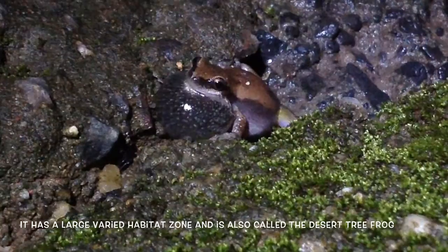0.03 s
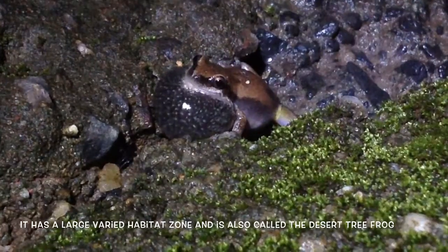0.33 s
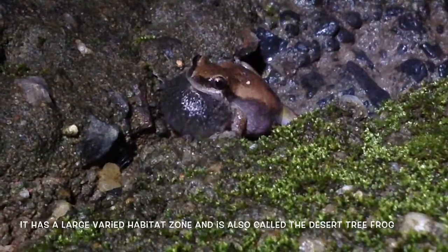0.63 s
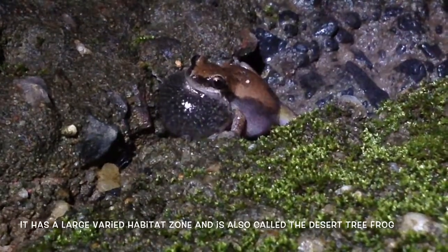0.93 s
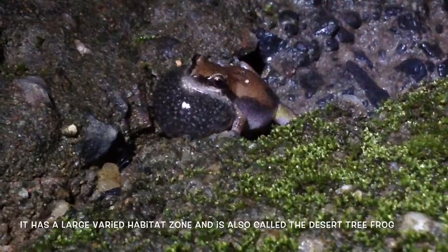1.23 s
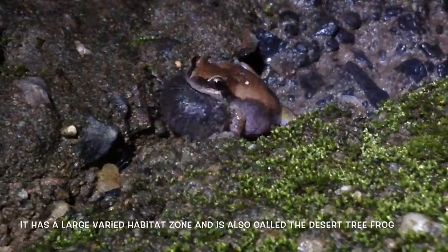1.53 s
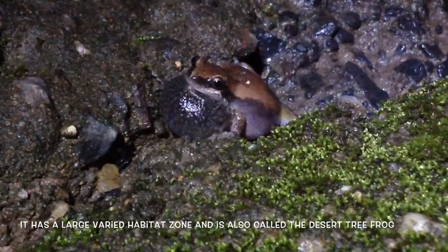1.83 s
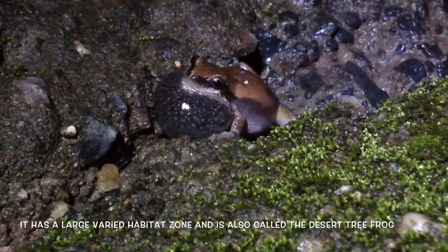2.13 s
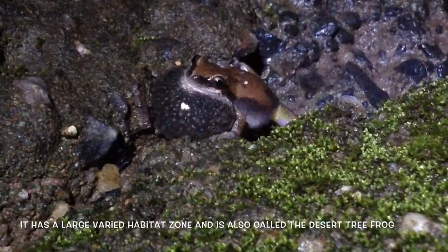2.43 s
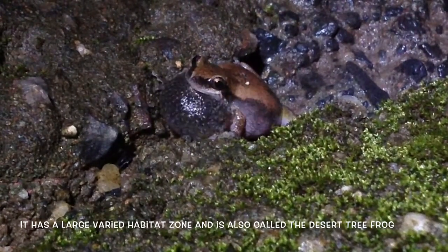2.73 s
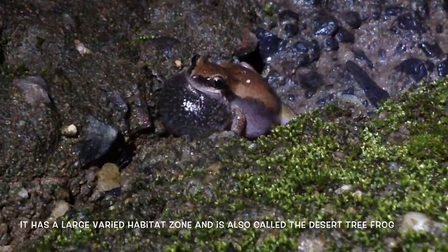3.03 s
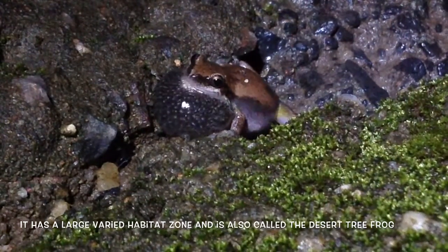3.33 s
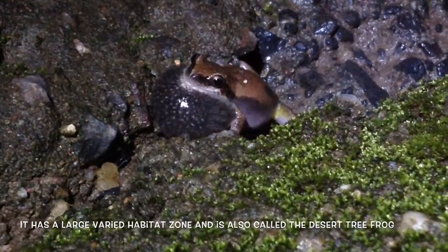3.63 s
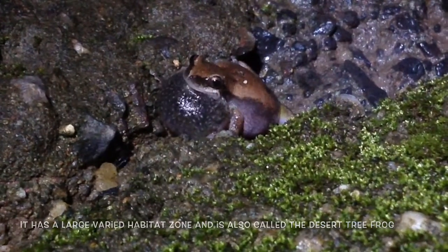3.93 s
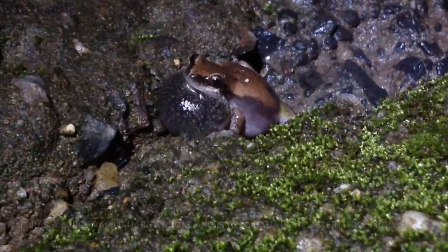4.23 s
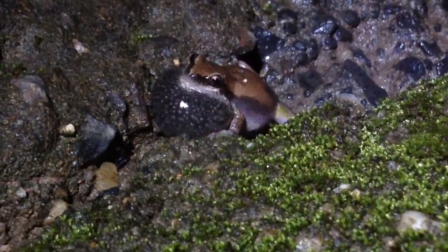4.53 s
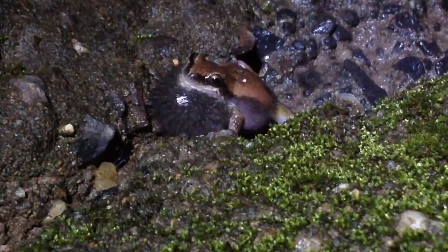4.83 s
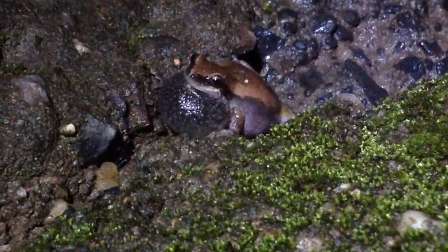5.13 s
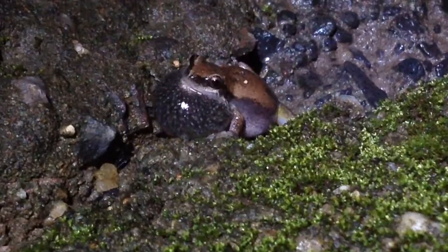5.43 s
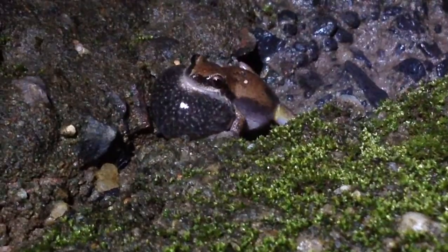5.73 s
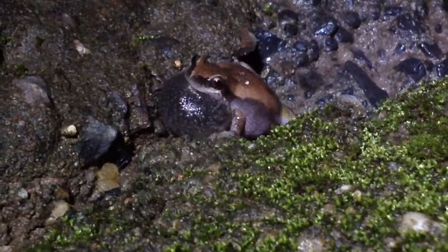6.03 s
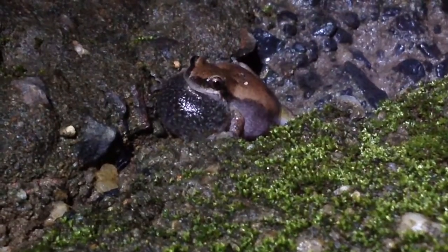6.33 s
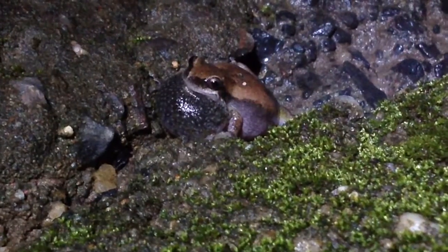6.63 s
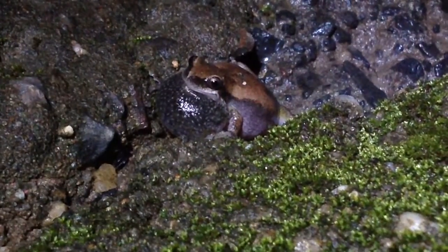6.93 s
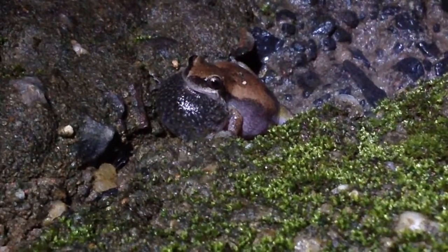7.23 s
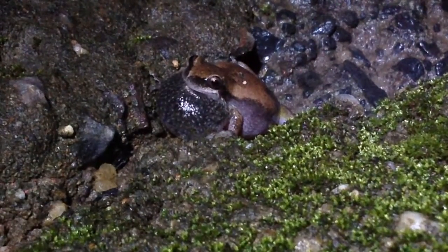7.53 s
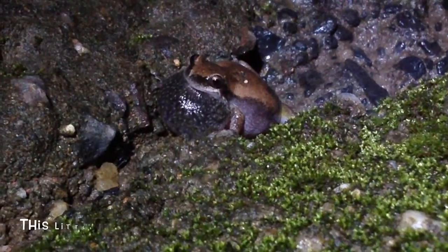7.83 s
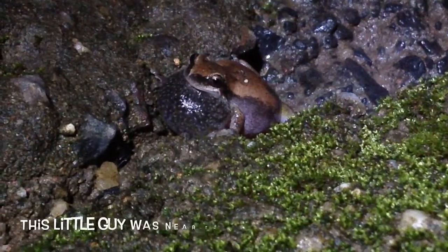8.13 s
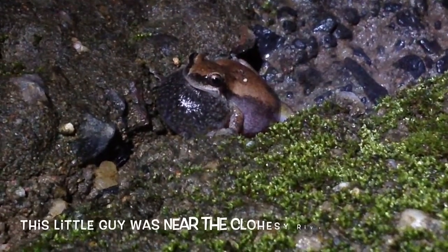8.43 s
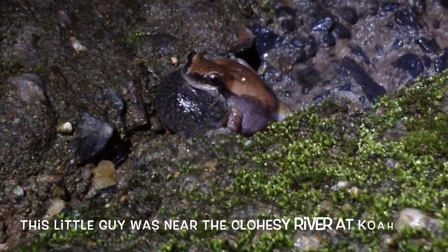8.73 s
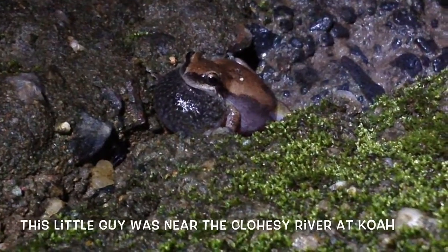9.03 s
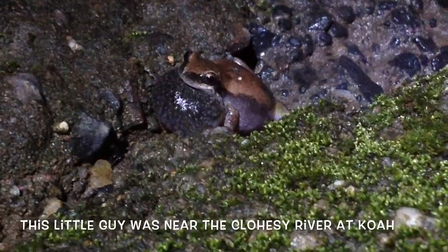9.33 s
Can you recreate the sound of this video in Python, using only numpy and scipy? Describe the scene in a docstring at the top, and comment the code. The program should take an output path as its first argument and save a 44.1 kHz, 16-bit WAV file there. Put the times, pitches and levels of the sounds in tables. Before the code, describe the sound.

Close, rasping frog croaks repeat about once a second, then stop, leaving a soft stream, night insects and far frogs.

```python
"""Harsh croaks sound close by, six in all, from a small tree frog on wet rocks. Each is a buzz of about
60 pulses a second, and each pulse is a volley of vocal fold clicks that rings a resonator, the vocal sac,
which tightens as the croak goes on. A thin falling whistle rides on the pulses; a cluck ends each croak.
Behind are the broad noise of a stream, a far frog chorus, a high insect buzz, the stridulation of
crickets and a katydid, soft low frog notes and, near the end, faint rising squeaks."""
import sys
import numpy as np
from scipy import signal
from scipy.fft import rfft, irfft, next_fast_len
from scipy.io import wavfile
from scipy.ndimage import uniform_filter1d, minimum_filter1d, map_coordinates

SR = 44100
rng = np.random.default_rng(int(sys.argv[2]) if len(sys.argv) > 2 else 0)


def unload_audio(sound):
    """Save the sound as a 16-bit wav file, at the path given as the first command line argument."""
    columns = np.transpose(np.atleast_2d(sound))
    # keep every value between -1 and 1, then stretch to whole-number steps
    steps = np.round(np.clip(columns, -1, 1) * 32767)
    wavfile.write(sys.argv[1], SR, steps.astype(np.int16))


N = 413216

# Levels are relative within each source.
# croaks: (first pulse [s], last pulse [s], level [dB], first pulse's offset [dB], closing cluck [s])
CROAKS = [(-.1215, 0.3743, -2.2, -9, .3953), (.8259, 1.3559, -3, -16, 1.3788),
          (1.8737, 2.42, -2.5, -5.5, 2.4403), (3.0368, 3.584, -2.5, -7, 3.6051),
          (4.2023, 4.766, -0.9, -4, 4.7803), (5.2132, 5.7773, -1.5, -3.5, 5.7981)]
# clicks of one pulse, sac slack or tight: (slack delay [s], tight delay [s], slack [dB], tight [dB])
VOLLEY = [(0, 0, -3.5, -4), (.00205, .00203, 0, .5), (.00417, .00413, -.5, -1.5), (.0057, .0056, -8, -10),
          (.007, .0072, -15, -19)]
# vocal sac resonances: (frequency [Hz], slack gain [dB], tight gain [dB])
SAC_RESPONSE = [(720, -85.5, -57), (1110, -39, -32), (1496, -5, -6.5), (1717, -4.5, -13), (2000, 0.5, 0.5),
                (2370, -4.5, 5), (2683, -8, 1), (2816, 0.5, 5), (3182, -20, -11.5), (3785, -54, -29),
                (5370, -42, -42), (6330, -53, -31.5), (11100, -64, -49)]
# the body wall passes the low part of the clicks: (frequency [Hz], gain [dB])
BODY_RESPONSE = [(100, -96), (280, -46), (440, -39.5), (700, -39.5), (1000, -25.5), (1170, -22),
                 (1440, -15.5), (1750, -9.5), (2300, -23), (4000, -68.5)]
# reverberation among the rocks: (frequency [Hz], time to decay 60 dB [s])
ROCK_DECAY = [(300, 0.024), (2500, 0.11), (10000, 0.039)]
# spectra of the stream, far chorus and insect buzz: (frequency [Hz], level [dB])
STREAM_SPECTRUM = [(25, -41), (60, -42), (100, -16), (160, -2), (300, -3), (550, -3), (800, -8.5),
                   (1500, -2), (5000, -27), (11000, -23), (15000, -11)]
CHORUS_SPECTRUM = [(700, -34.5), (1150, -27), (1400, -12.5), (1580, -1.5), (1800, -1.5), (2100, -4.5),
                   (2400, 3), (2650, 0), (2900, 3), (3300, -2.5), (3700, -8.5), (4700, -7.5), (5300, -36)]
BUZZ_SPECTRUM = [(5400, -38), (6200, 3), (7300, -10), (8200, 1), (9200, 8), (10200, -1), (11000, -2.5),
                 (13500, -12), (15000, -10)]
# their slow envelopes: (time [s], level [dB])
STREAM_LEVEL = [(0, -70), (3.2, -71.5), (7.9, -69.5), (9, -66.5)]
CHORUS_LEVEL = [(.6, -49.5), (1.7, -51), (2.9, -42), (4.05, -45), (4.9, -50.5), (5.95, -50), (6.7, -42.5),
                (7.55, -40), (9.3, -42.5)]
BUZZ_LEVEL = [(.5, -52), (1.8, -49), (4.1, -50.5), (4.9, -57.5), (5.9, -62), (8.5, -57.5), (9.3, -59)]
# far crickets: (centre frequency [Hz], bandwidth [Hz], level [dB])
CRICKET_BANDS = [(2370, 128, -46.5), (4184, 500, -51.5), (7630, 1680, -56)]
# resonance of the closing cluck: (frequency [Hz], gain [dB])
CLUCK_RESPONSE = [(150, -54), (500, -50), (800, -13.5), (1150, -7), (1600, -2.5), (2400, 2), (2850, 1),
                  (3300, -37), (6000, -46), (11000, -53)]
# far low frog notes: (centre time [s], level [dB])
HOOTS = [(.67, -65), (1.5, -66), (2.67, -71), (4.11, -62), (5.01, -62.5), (6.308, -67), (6.56, -66),
         (6.85, -63.5), (7.26, -67), (7.75, -62), (8.08, -66), (8.7, -62), (9.02, -69)]
# nearer crickets: (start [s], end [s], frequency [Hz], pulse rate [1/s], level [dB])
CHIRPS = [(1.27, 1.58, 4298, 56, -43), (2.42, 2.74, 4298, 56, -38), (4.7, 5.03, 4298, 56, -40),
          (6.42, 6.77, 4298, 56, -37), (9.06, 9.42, 4298, 56, -37), (4.75, 5.2, 7760, 62, -57),
          (6.25, 6.7, 7760, 62, -55), (7.7, 8.17, 7760, 62, -52), (6.5, 7.25, 8264, 62, -55)]
# far squeaks: (centre time [s], duration [s], start pitch [Hz], end pitch [Hz], level [dB])
SQUEAKS = [(8.48, .2, 1000, 1250, -62), (8.547, 0.088, 1030, 1300, -51), (8.698, 0.175, 1020, 1280, -55.5),
           (8.814, 0.24, 980, 1375, -56), (8.885, .14, 980, 1250, -56), (9.22, .24, 1000, 1330, -55)]


def amp(db):
    """Decibels to amplitude ratio."""
    return 10 ** (np.asarray(db) / 20)


def unit(x):
    """Normalisation to rms 1."""
    return x / np.sqrt(np.mean(x ** 2) + 1e-20)


def along(points, hz):
    """Interpolation of (frequency, value) points on a logarithmic axis."""
    frequencies, values = np.transpose(points)
    return np.interp(np.log(hz + 1), np.log(frequencies + 1), values)


def clock():
    """The time of every sample."""
    return np.arange(N) / SR


def during(start, end):
    """Sample indices and times of an interval."""
    index = np.arange(max(int(start * SR), 0), min(int(end * SR), N))
    return index, index / SR


def level(rows):
    """An envelope in dB, interpolated at every sample."""
    return np.interp(clock(), *np.transpose(rows))


def wobble(rate):
    """Smooth random modulation, rate knots a second."""
    knots = rng.standard_normal(int(N * rate / SR) + 4)
    at = np.arange(0, len(knots) - 1, .25)
    return np.interp(clock() * rate, at, map_coordinates(knots, [at]))


def filtered(x, response):
    """Linear filtering: the spectrum of x times a frequency response."""
    size = next_fast_len(N + 8192)
    return irfft(rfft(x, size) * response(np.fft.rfftfreq(size, 1 / SR)), size)[:N]


def noise(spectrum):
    """Coloured noise of rms 1."""
    return unit(filtered(rng.standard_normal(N), lambda hz: amp(along(spectrum, hz))))


def band(centre_hz, width_hz):
    """Narrowband noise of rms 1."""
    white = rng.standard_normal(N)
    return unit(filtered(white, lambda hz: 1 / (1 + ((hz - centre_hz) / width_hz * 2) ** 4) ** .5))


def ring(x, spectrum, size=2048):
    """Forced response of a minimum-phase resonator with the given spectrum."""
    cepstrum = irfft(np.log(amp(along(spectrum, np.fft.rfftfreq(size, 1 / SR)))))
    cepstrum[1:size // 2] *= 2
    cepstrum[size // 2 + 1:] = 0
    return signal.oaconvolve(x, irfft(np.exp(rfft(cepstrum))))[:N]


def clicks(times, sizes, order=8):
    """Band-limited impulses, placed between samples by sinc interpolation."""
    at = np.ravel(times)[:, None] * SR
    index = np.floor(at).astype(int) + np.arange(1 - order, order + 1)
    taps = np.ravel(sizes)[:, None] * np.sinc(index - at) * np.sinc((index - at) / order)
    inside = (index >= 0) & (index < N)
    return np.bincount(index[inside], taps[inside], N)


def swell(t, length):
    """A raised-cosine window centred on t = 0."""
    return np.cos(np.pi * np.clip(t / length, -.5, .5)) ** 2


def bend(share, power):
    """A power-law rise from 0 to 1 that starts fast and levels off."""
    return 1 - (1 - np.clip(share, 0, 1)) ** power


def release(share, last_share=.09):
    """A ramp from 0 to 1 over the end of a croak, as the air runs out."""
    return np.clip(1 - (1 - share) / last_share, 0, 1)


def pulses(period_s=.01657, jitter_s=.00015, effort_db=6.5, attack_db=4, sag_db=6.5, release_db=8):
    """A quasi-periodic pulse train: the time, share of its croak (0-1) and amplitude of every pulse."""
    rows = []
    for start, end, db, first_db, _ in CROAKS:
        share = np.linspace(0, 1, round((end - start) / period_s) + 1)
        # the pace quickens throughout, but the first pulses are hasty and the last ones drag
        spacing = 1 - .1 * share - .11 * np.exp(-share / .03) + .07 * release(share)
        elapsed = np.cumsum(spacing) - spacing
        times = start + (end - start) * elapsed / elapsed[-1]
        times += jitter_s * rng.standard_normal(len(share))
        onset = np.clip(1 - share / .089, 0, 1)
        envelope_db = effort_db - attack_db * onset - sag_db * share - release_db * release(share)
        rows.append([times, share, amp(db + envelope_db + first_db * (share == 0))])
    return np.hstack(rows)


def croaks(times, share, sizes, sac_db=23.0, body_db=26.5, scatter_db=2.2,
           slack_hz=1960, tight_hz=2210, tire_hz_per_s=9, wander_hz=25):
    """Source and filter: vocal fold clicks ring the sac, higher and rougher as it tightens."""
    tighten_from, tighten_to = .095, .91  # shares of the croak
    tight = bend((share - tighten_from) / (tighten_to - tighten_from), 1.75)[:, None]
    slack_s, tight_s, slack_db, tight_db = np.transpose(VOLLEY)
    gap_error, force_error, phase_error = rng.standard_normal((len(times), 3, len(VOLLEY))).swapaxes(0, 1)
    gaps = np.diff(slack_s + tight * (tight_s - slack_s), prepend=0) * (1 + .02 * gap_error)
    delay = np.cumsum(gaps, axis=1)
    at = times[:, None] + delay
    force = sizes[:, None] * amp(slack_db + tight * (tight_db - slack_db) + scatter_db * force_error)
    pitch = slack_hz + tight * (tight_hz - slack_hz) - tire_hz_per_s * times[:, None]
    pitch += wander_hz * np.interp(times, clock(), wobble(14))[:, None]
    # each click pushes nearly in step with the ringing, so a volley adds up at the sac's pitch
    phase_slip = np.cumsum((.35 + .4 * tight) * phase_error * (delay > 0), axis=1)
    push = force * np.exp(1j * (2 * np.pi * pitch * delay + phase_slip))

    def drive(weight):
        """Phase-shifted impulses, summed from in-phase and quadrature parts."""
        return clicks(at, weight * push.real) + filtered(clicks(at, weight * push.imag), lambda hz: 1j)

    slack_sac = ring(drive(1 - tight), np.array(SAC_RESPONSE)[:, [0, 1]])
    tight_sac = ring(drive(tight), np.array(SAC_RESPONSE)[:, [0, 2]])
    body = ring(clicks(at, force), BODY_RESPONSE)
    return amp(sac_db) * (slack_sac + tight_sac) + amp(body_db) * body


def whistle(times, share, sizes, start_hz=16100, end_hz=12720, waver_hz=260,
            level_db=-38.5, fade_in_db=34, release_db=12, spit_db=-35):
    """Flow noise and tone: air spits through the larynx in the first pulses, then whistles, falling."""
    lag_s, length_s = .004, .014  # one puff to each pulse
    full_share, spit_share = .67, .05
    t = clock()
    nearest = np.searchsorted((times[1:] + times[:-1]) / 2 + lag_s, t)
    hz = start_hz + (end_hz - start_hz) * bend(share, 1.45)
    db = level_db - fade_in_db * (1 - bend(share / full_share, 2)) - release_db * release(share)
    phase = 2 * np.pi * np.cumsum(hz[nearest] + waver_hz * wobble(550)) / SR
    tone = amp(db)[nearest] * np.sin(phase)
    spit = (amp(spit_db) * np.exp(-share / spit_share))[nearest] * band(6450, 850)
    return (tone + spit) * sizes[nearest] * swell(t - times[nearest] - lag_s, length_s)


def rocks(x, level_db=-16.0):
    """Scattering off the stones adds a short diffuse tail that decays exponentially."""
    hz, t, spectra = signal.stft(rng.standard_normal(SR // 4), SR, nperseg=256)
    decay = 1e-3 ** (t / along(ROCK_DECAY, hz)[:, None])
    tail = signal.istft(spectra * decay, SR, nperseg=256)[1]
    return amp(level_db) * signal.oaconvolve(x, tail / np.linalg.norm(tail))[:N]


def stream(gain_db=8.5, flicker_db=.9):
    """Running water radiates broadband noise whose level flickers."""
    return amp(level(STREAM_LEVEL) + gain_db + flicker_db * wobble(42)) * noise(STREAM_SPECTRUM)


def chorus(gain_db=1.0, waver_db=1.27, flutter_db=.51):
    """Incoherent summation: many far frogs merge into a noise that swells twice."""
    db = level(CHORUS_LEVEL) + gain_db + waver_db * wobble(7.4) + flutter_db * wobble(120)
    return amp(db) * noise(CHORUS_SPECTRUM)


def insect_buzz(gain_db=.5):
    """Insects sum incoherently to a high noise, which recedes halfway through."""
    return amp(level(BUZZ_LEVEL) + gain_db) * noise(BUZZ_SPECTRUM)


def far_crickets(waver_db=1.2):
    """Superposition merges the tones of far crickets into wavering bands of noise."""
    return sum(amp(db + waver_db * wobble(22)) * band(hz, width) for hz, width, db in CRICKET_BANDS)


def katydid(syllable_rate=21.265, wing_hz=6740, sweep_hz=70, tone_db=-50.5, overtone_db=-52):
    """Stridulation: three wing strokes to a syllable, the third weak, each sweeping the wing's tone."""
    strokes = 3 * syllable_rate * (clock() - .0115)
    weak = np.floor(strokes) % 3 == 2
    stroke = np.abs(np.sin(np.pi * strokes)) * amp(-8 * weak)
    scrape = np.abs(np.sin(2 * np.pi * strokes)) * amp(-6 * weak)  # the overtone flares twice a stroke
    sweep = sweep_hz / (3 * syllable_rate) * np.sin(2 * np.pi * strokes)
    wing = unit(np.sin(2 * np.pi * wing_hz * clock() + sweep + wobble(300)))
    return amp(tone_db) * stroke * wing + amp(overtone_db) * scrape * band(13140, 850)


def clucks(level_db=10, spacing_s=.0014, fade_db=2.0, count=7):
    """Damped, irregular vibration: the folds flutter as they close, ending each croak on a lower cluck."""
    gap_error, force_error = rng.standard_normal((len(CROAKS), 2, count)).swapaxes(0, 1)
    gaps = spacing_s * np.exp(.29 * gap_error)
    at = np.array(CROAKS)[:, -1:] + np.cumsum(gaps, axis=1) - gaps
    force = amp(level_db - fade_db * np.arange(count) + 2 * force_error)
    return ring(clicks(at, force), CLUCK_RESPONSE)


def hoots(pitch_hz=430, length_s=.16, gain_db=-2):
    """Soft low notes of far frogs: swells of noise in a band narrow enough to have a pitch."""
    out, hum = np.zeros(N), band(pitch_hz, width_hz=44)
    for centre, db in HOOTS:
        index, t = during(centre - length_s / 2, centre + length_s / 2)
        out[index] += amp(db + gain_db) * swell(t - centre, length_s) * hum[index]
    return out


def near_crickets(edge_s=.033):
    """Amplitude modulation: each nearer cricket's chirp is a pure tone in rapid pulses."""
    out = np.zeros(N)
    for start, end, hz, rate, db in CHIRPS:
        index, t = during(start, end)
        gate = np.clip(np.minimum(t - start, end - t) / edge_s, 0, 1)
        out[index] += amp(db) * gate * np.sin(np.pi * rate * t) ** 2 * np.sin(2 * np.pi * hz * t)
    return out


def squeaks(rasp=2.1):
    """Faint rising glides, made raspy by the sidebands of fast random amplitude modulation."""
    out, grain = np.zeros(N), unit(1 + rasp * wobble(250))
    for centre, length, start_hz, end_hz, db in SQUEAKS:
        index, t = during(centre - length / 2, centre + length / 2)
        phase = 2 * np.pi * np.cumsum(np.linspace(start_hz, end_hz, len(t))) / SR
        out[index] += amp(db) * swell(t - centre, length) * grain[index] * np.sin(phase)
    return out


def scene():
    """Superposition of the near frog, its reflections and the sounds of the night."""
    train = pulses()
    frog = croaks(*train) + clucks() + whistle(*train)
    near = frog + rocks(frog)
    steady = stream() + chorus() + insect_buzz() + far_crickets() + katydid()
    calls = hoots() + near_crickets() + squeaks()
    return (near + steady + calls)[None]


def record(dry, ceiling=1.0, window_samples=180, top_hz=15400):
    """Peak and band limiting: a fast gain dip holds down the pulses, then a low-pass cuts the top."""
    needed = np.minimum(1, ceiling / (np.abs(dry[0]) + 1e-9))
    held = minimum_filter1d(needed, 2 * window_samples)
    gain = uniform_filter1d(uniform_filter1d(held, window_samples), window_samples)
    return filtered(dry[0] * gain, lambda hz: hz < top_hz)[None]


dry = scene()
out = record(dry)
unload_audio(out)
```